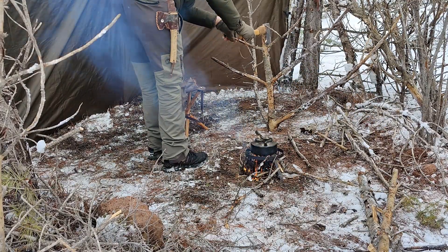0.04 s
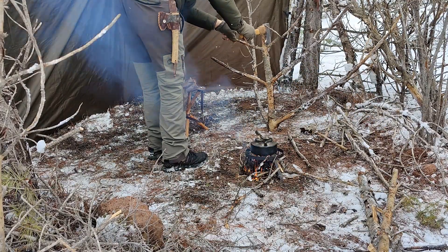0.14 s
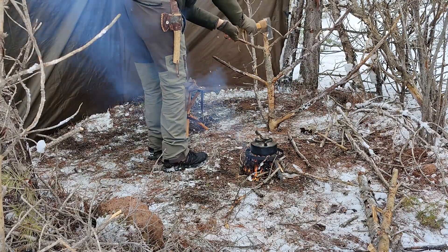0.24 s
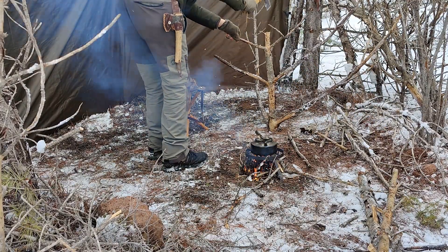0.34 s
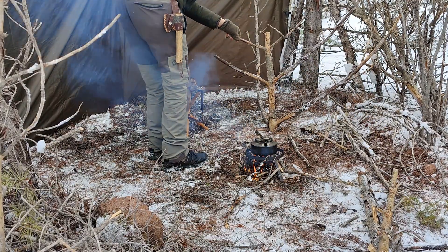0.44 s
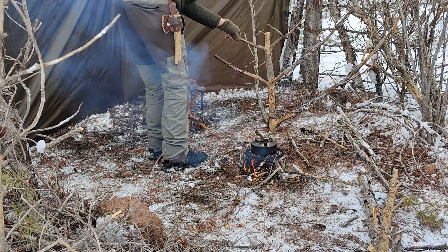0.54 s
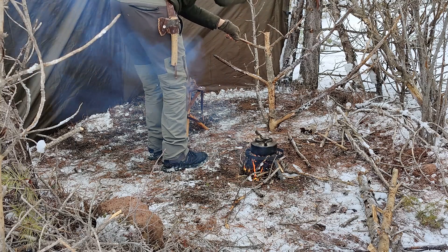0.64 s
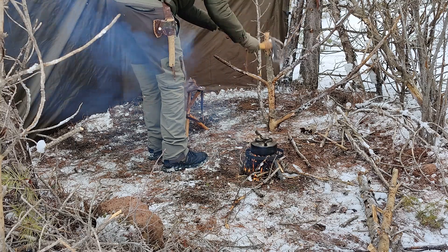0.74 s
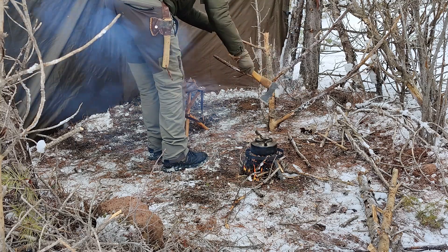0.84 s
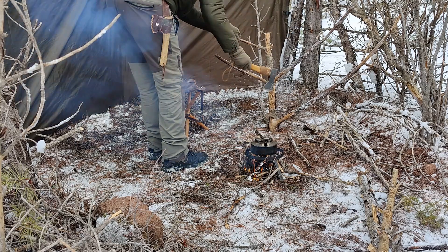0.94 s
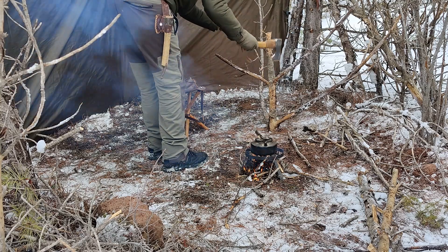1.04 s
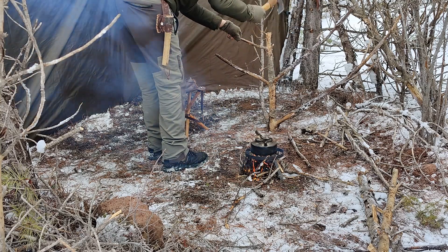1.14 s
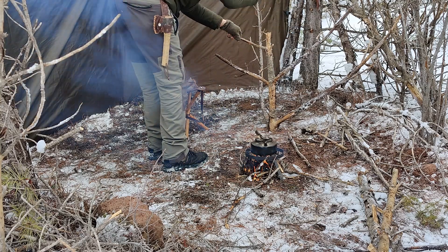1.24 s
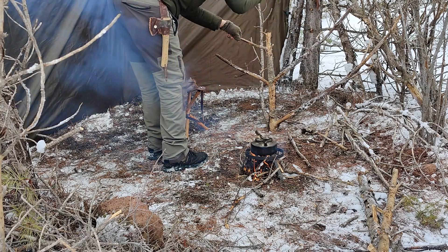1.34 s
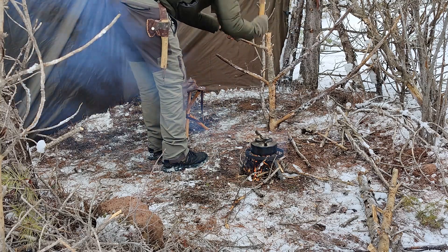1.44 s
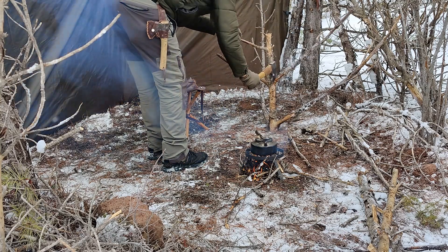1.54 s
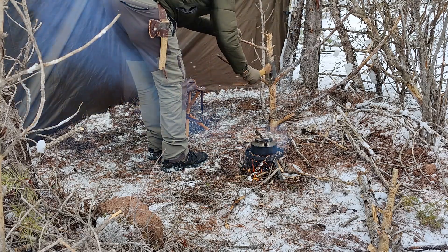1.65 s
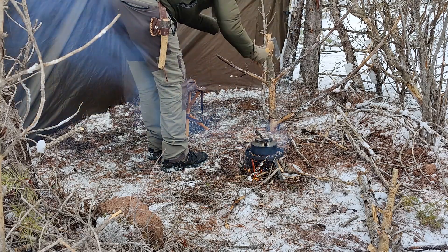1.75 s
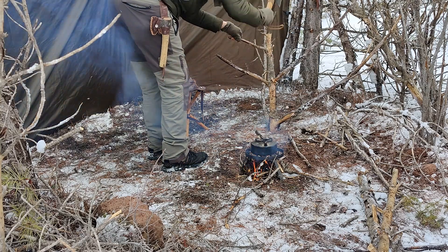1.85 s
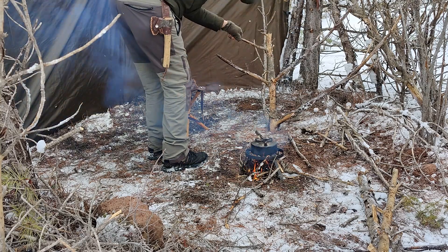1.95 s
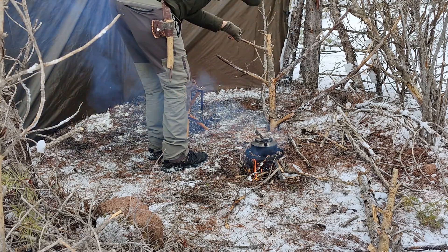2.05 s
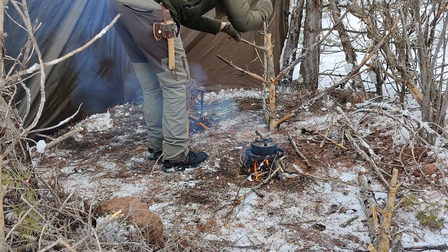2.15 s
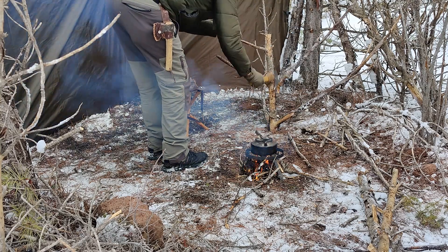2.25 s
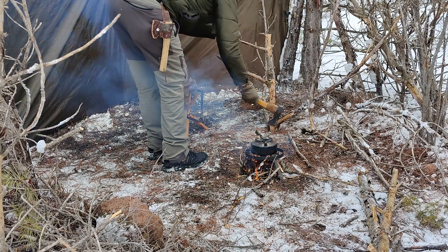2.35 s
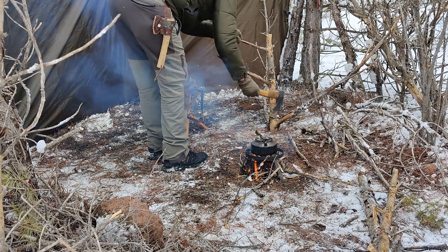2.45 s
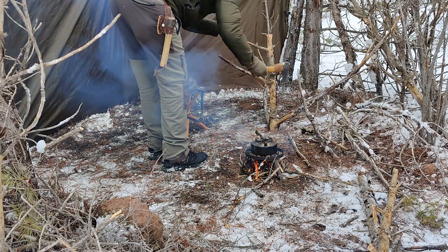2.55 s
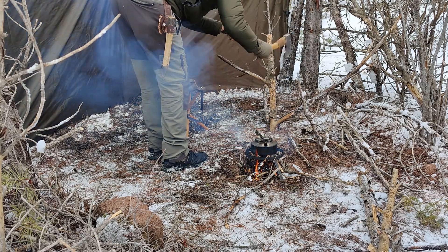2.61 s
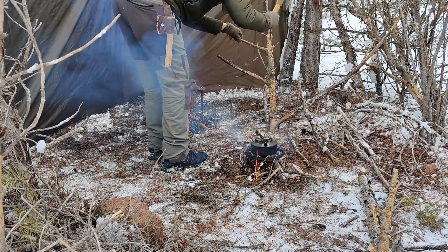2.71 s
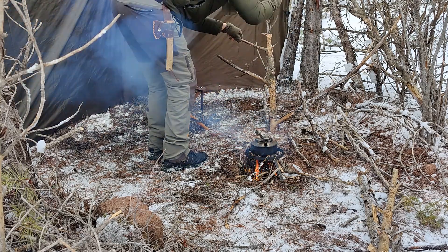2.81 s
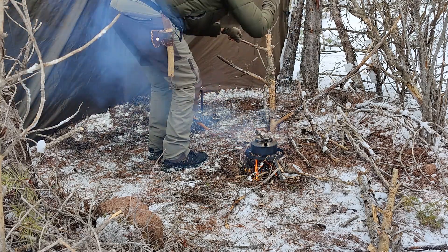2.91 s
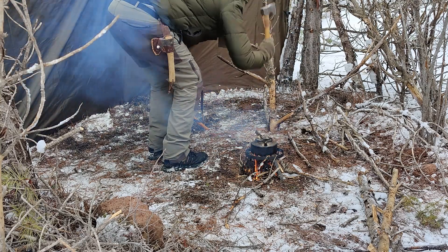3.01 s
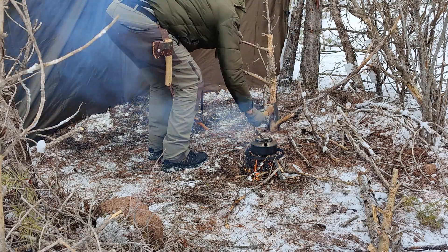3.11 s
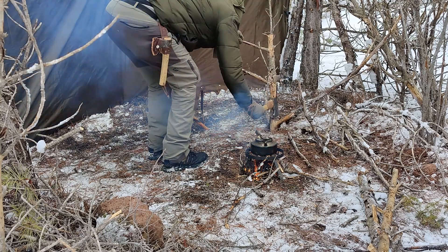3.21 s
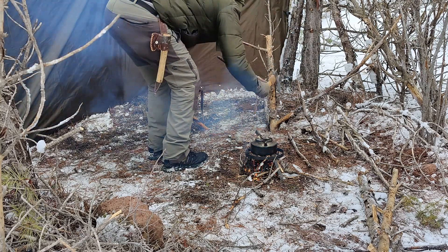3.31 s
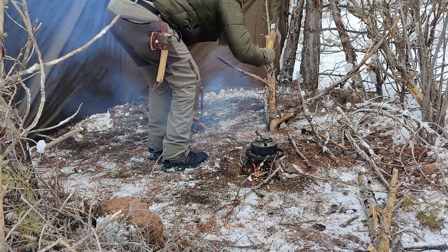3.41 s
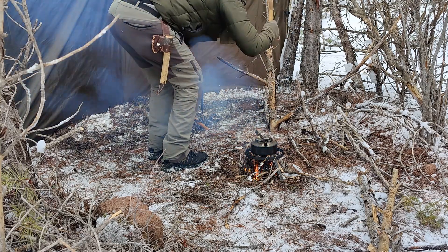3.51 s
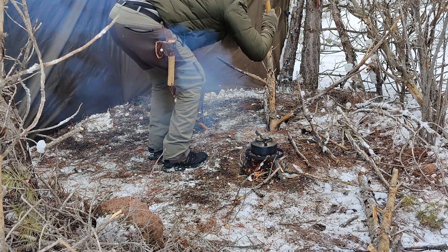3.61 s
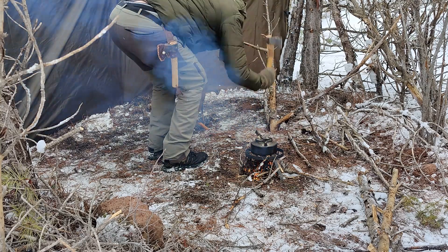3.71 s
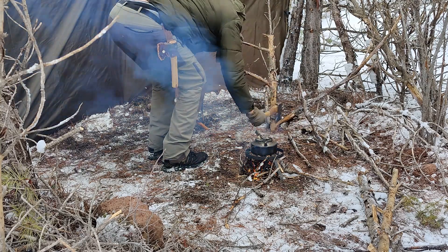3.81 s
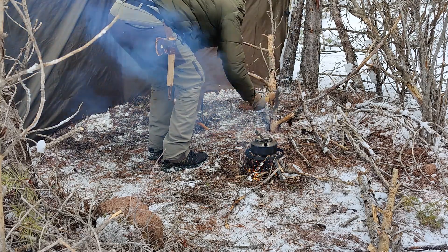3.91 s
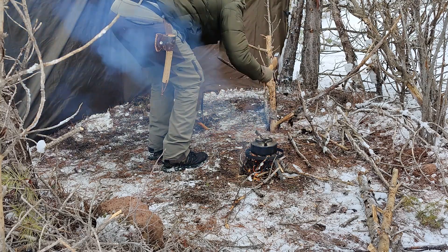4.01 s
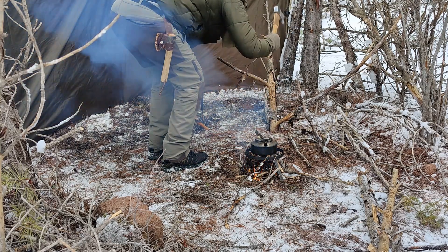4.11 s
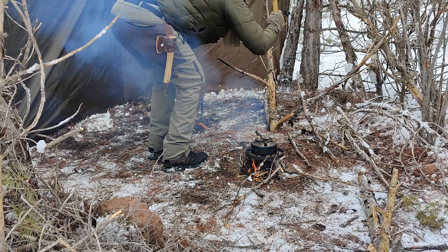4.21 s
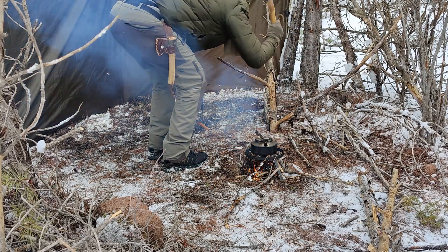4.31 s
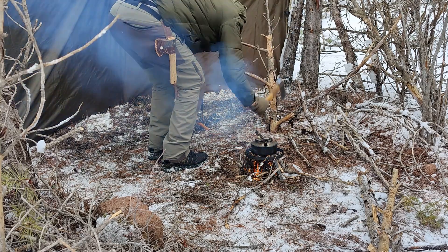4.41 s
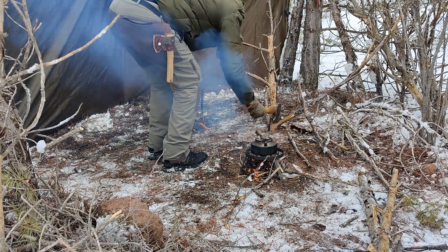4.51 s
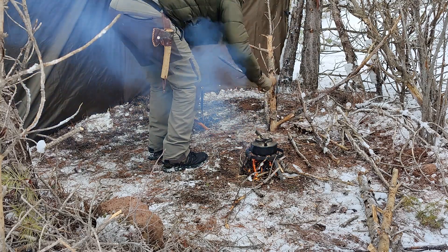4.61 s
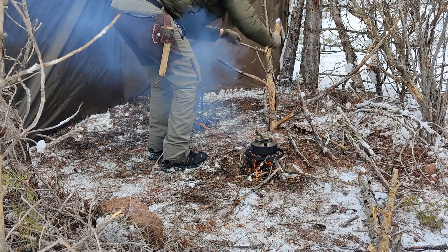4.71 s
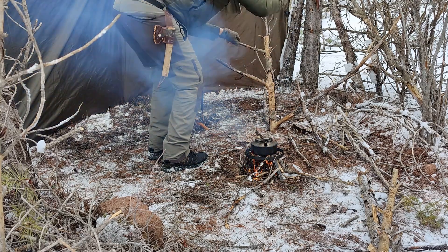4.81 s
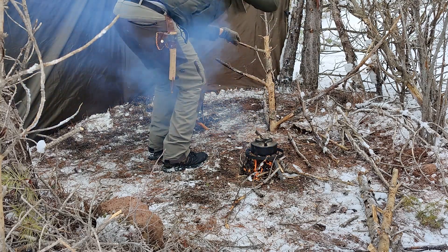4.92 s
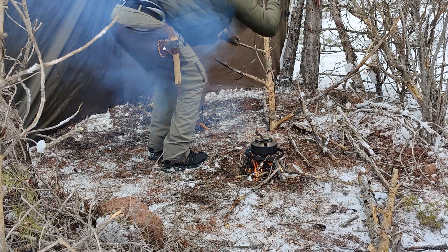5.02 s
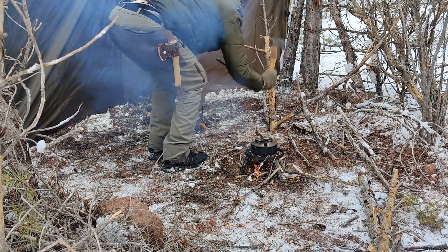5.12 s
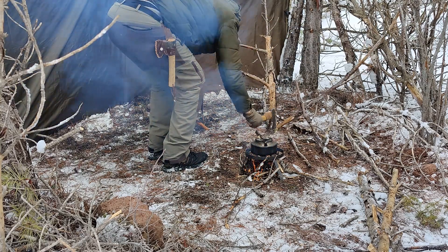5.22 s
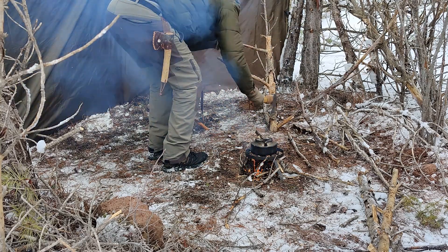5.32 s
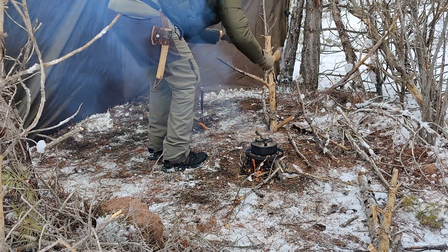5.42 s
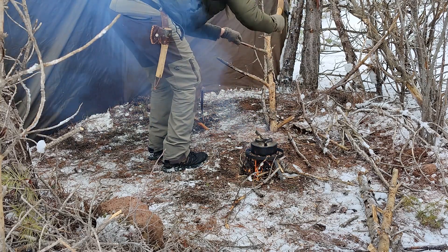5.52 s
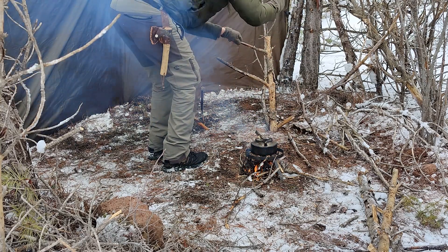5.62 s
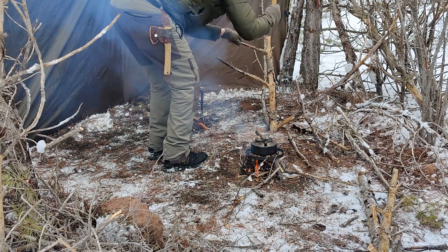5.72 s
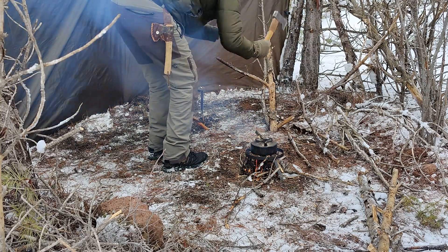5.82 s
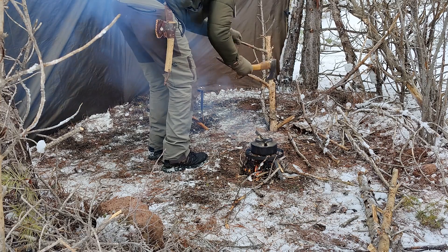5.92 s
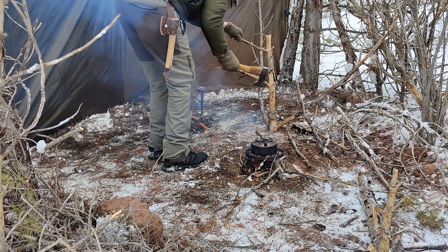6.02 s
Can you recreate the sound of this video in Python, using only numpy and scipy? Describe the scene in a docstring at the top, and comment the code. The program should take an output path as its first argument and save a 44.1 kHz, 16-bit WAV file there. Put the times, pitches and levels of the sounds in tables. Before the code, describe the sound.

Quiet low wind throbs under a very faint air hiss; soft cloth or boot scuffs and a small patter come at 0.1-0.4 s. At 0.87 s a hatchet hits a thin standing sapling: a bright, splintery crack with little thump, then a dense flurry of snapping twigs and falling bark until 1.2 s. The second blow at 1.65 s adds a low soil thud and high ticking chips around 2 s. The third, 2.38 s, is duller and lower, with rustling sleeves after it. The fourth, 3.24 s, has a hard double crack and strong thump. Blows at 3.91, 4.57 and 5.29 s are the loudest knocks, short, hollow and woody around 1.8 kHz, with fewer crumbs between. Wind drops away after 4 s. Light rubbing and sparse ticks finish to 6 s. Dry outdoor space, stereo microphone a few metres off, slight scatter from trunks.

```python
"""First a low wind rumble over faint air hiss, with a soft scuff of cloth or boots and a little patter.
Then a hatchet chops a thin standing sapling, a few metres from two microphone ports, on frozen forest ground.
Each blow rings damped stem modes, cracks in noise bands and sends a late low wave packet through the soil.
Twigs, chips and second cracks just after some blows are clicks with a crackle and one ringing mode; bark and
needles patter as grainy noise; sleeves and boots rub as dull noise."""
import sys
import numpy as np
from scipy import signal
from scipy.fft import rfft, irfft, next_fast_len
from scipy.io import wavfile
from scipy.ndimage import uniform_filter1d

SR = 44100
rng = np.random.default_rng(int(sys.argv[2]) if len(sys.argv) > 2 else 0)


def wav_out(sig):
    """Save sig, one row per channel (or a flat mono array), as 16-bit PCM at SR to the path in sys.argv[1]."""
    wavfile.write(sys.argv[1], SR, np.round(np.clip(np.atleast_2d(sig).T, -1, 1) * 32767).astype(np.int16))


N = 266893  # length in samples


def undb(db):
    """Turn dB into amplitude gain."""
    return 10 ** (np.asarray(db) / 20)


def on_log(points, hz):
    """Read (frequency [Hz], value) points on a log-frequency axis."""
    point_hz, values = np.transpose(points)
    return np.interp(np.log(np.maximum(hz, 1)), np.log(point_hz), values)


def unit(x):
    """Scale to rms 1."""
    return x / np.sqrt(np.mean(x ** 2))


def band(x, lo_hz, hi_hz):
    """Causal band-pass, so nothing sounds ahead of its cause."""
    return signal.sosfilt(signal.butter(2, [lo_hz, hi_hz], "band", fs=SR, output="sos"), x)


def coloured(x, points):
    """Shape the spectrum by (frequency [Hz], level [dB]) points; rms 1."""
    size = next_fast_len(N)
    hz = np.arange(size // 2 + 1) * SR / size
    shaped = irfft(rfft(x, size) * undb(on_log(points, hz)), size)[:, :N]
    return unit(shaped)


def grains(n, grit_db, hold):
    """Three noises sharing grains of hold samples with scattered sizes; rms near 1."""
    grain_db = grit_db * np.minimum(rng.exponential(1, n // hold + 1), 3.5)
    sizes = undb(grain_db).repeat(hold)[:n]
    return rng.standard_normal((3, n)) * sizes / np.sqrt(np.mean(sizes ** 2))


def walk(rate):
    """Random levels, rate new ones a second, joined by straight slopes; spread a little under 1."""
    k = int(SR / rate)
    return uniform_filter1d(np.repeat(rng.standard_normal(N // k + 1), k), k)[:N]


def fade(t, t60, rise):
    """Fast rise, then decay by 60 dB in t60."""
    return (1 - np.exp(-t / rise)) * undb(-60 * t / t60)


def add(out, s, sound):
    """Mix a sound in at time s."""
    i = int(s * SR)
    out[:, i:i + sound.shape[1]] += sound[:, :N - i]


PORT_LAG_S = 3 / 44100  # the left port hears a source this much later
# how alike the two ports hear one source: (frequency [Hz], power share common to both, before scaling [1])
LIKENESS = [(100, 1), (600, 0.92), (2000, 0.097), (5000, 0.21), (12000, 0.11)]


def ports(excite, alike=0.96):
    """Two ports hear one source: the bass alike, the left a little late, the treble mostly unrelated."""
    size = next_fast_len(excite.shape[1])
    hz = np.arange(size // 2 + 1) * SR / size
    common = np.clip(alike * on_log(LIKENESS, hz), 0, 1)
    both, left, right = rfft(excite, size)
    late = np.exp(-2j * np.pi * hz * PORT_LAG_S)
    shared = np.sqrt(common) * both * np.array([late, late ** 0])
    own = np.sqrt(1 - common) * np.array([left, right])
    return irfft(shared + own, size)[:, :excite.shape[1]]


def patchy(x, lo_hz, count, patchy_db, rate):
    """Third-octave bands that each flare and sink on their own, as in folds of cloth; rms 1."""
    edges = lo_hz * 2 ** (np.arange(count + 1) / 3)
    total = 0
    for k in range(count):
        flare = undb(patchy_db * walk(rate))
        # alternate signs keep neighbouring bands from cancelling where they meet
        total = total + (-1) ** k * flare * band(x, edges[k], edges[k + 1])
    return unit(total)


def ring(hz, db, t60):
    """One damped mode, a decaying sine alike at both ports, cut off after t60."""
    t = np.arange(int(t60 * SR)) / SR
    return np.tile(undb(db) * fade(t, t60, .0002) * np.sin(2 * np.pi * hz * t), (2, 1))


# slow course of the wind rumble, before its throb: (time [s], level [dB])
WIND = [(0, -62), (.1, -53), (.5, -58.5), (.85, -56), (.98, -58), (1.2, -55.5), (1.5, -54.5), (1.85, -58),
        (2.2, -53), (2.55, -54), (2.8, -55.5), (3.2, -55), (3.5, -51.5), (3.66, -57), (3.85, -55.5),
        (4.1, -63.5), (5, -66.5), (6.05, -67)]


def wind_db():
    """Level of the wind rumble, sample by sample, in straight slopes."""
    return np.interp(np.arange(N) / SR, *np.transpose(WIND))


AIR_DB, HISS_SHARE = -67, .15  # hiss level at the strongest wind, dB; dB it sinks per dB of rumble
# colour of the wind rumble: (frequency [Hz], relative level [dB per Hz])
GUST = [(12, -38.5), (20, -13.5), (48, -2), (70, 1), (87, -4.5), (145, -16), (193, -23.5), (231, -30.5),
        (300, -30), (390, -53), (660, -120)]
# colour of the air hiss: (frequency [Hz], relative level [dB per Hz])
AIR = [(88, -26.5), (150, -13), (259, -18.5), (888, -21), (1120, -13.5), (2700, -25.5), (5910, -28.5),
       (7180, -27), (13700, -27.5), (16000, -27.5)]


def air():
    """Wind as low noise that throbs at random, over a faint wide hiss that follows it weakly."""
    wind = wind_db()
    gusts = coloured(ports(rng.standard_normal((3, N))), GUST)
    rumble = undb(wind + 1.6 * walk(4)) * gusts
    hiss = coloured(ports(rng.standard_normal((3, N)), alike=0.085), AIR)
    hiss_db = AIR_DB + HISS_SHARE * (wind - wind.max()) + 1.5 * walk(3)
    return rumble + undb(hiss_db) * hiss


TWIG_SOUGH_DB, SOUGH_SHARE = -68.5, 0.24  # dull sough at the strongest wind, dB; dB it sinks per dB of rumble
# rubs of cloth and boots: (middle time [s], half length to 1/e of the gain [s], level [dB])
SCUFFS = [(.03, .04, -68), (0.16, 0.011, -59), (0.23, 0.022, -65.5), (1.044, 0.021, -55),
          (1.718, 0.057, -60.5), (1.882, 0.035, -61.5), (2.088, 0.014, -55.5), (2.451, 0.074, -53.5),
          (2.594, 0.016, -53.5), (2.674, .03, -56), (2.765, 0.028, -59.5), (2.877, 0.063, -59.5),
          (3.012, 0.065, -63.5), (3.188, 0.078, -65), (3.3, 0.071, -58.5), (3.407, 0.0075, -44.5),
          (3.445, 0.068, -58), (3.568, 0.059, -52.5), (3.79, 0.059, -64), (3.899, 0.021, -54.5),
          (3.978, 0.053, -59), (4.122, 0.015, -51.5), (4.243, 0.054, -57.5), (4.43, 0.011, -63.5),
          (4.533, 0.11, -62), (4.632, 0.035, -54.5), (4.809, 0.021, -57.5), (4.877, 0.052, -63.5),
          (5.125, .04, -60), (5.277, 0.026, -57), (5.362, 0.056, -58.5), (5.537, 0.0099, -71),
          (5.827, 0.013, -62), (5.87, 0.028, -61.5), (5.93, .04, -66), (6.043, 0.047, -57)]


def scuffs():
    """Gain of the dull rub: bell-shaped scuffs over a sough of twigs that follows the wind; powers add."""
    t = np.arange(N) / SR
    wind = wind_db()
    power = undb(TWIG_SOUGH_DB + SOUGH_SHARE * (wind - wind.max())) ** 2
    for s, half, db in SCUFFS:
        power = power + undb(2 * db) * np.exp(-2 * ((t - s) / half) ** 2)
    return np.sqrt(power)


SHOWER_RISE_S = 0.024
# bark and needles, shaken loose by a blow or brushed off:
# (start time [s], t60 [s], patter level [dB], middle level [dB], top minus patter level [dB])
SHOWERS = [(.01, 0.2, -59.5, -62, -10), (.14, .3, -67.5, -61, -8), (.205, 0.22, -49.5, -54.5, -5),
           (.79, .2, -58, -67.5, -6), (.89, 0.45, -44.5, -49, 3.5), (0.95, 0.22, -36, -33.5, 1),
           (1.02, 0.72, -53, -58, 3.5), (1.11, 0.34, -46, -67, -4), (1.185, 0.43, -53.5, -67.5, -1),
           (1.35, 0.27, -70, -66.5, -17), (1.69, 0.47, -55, -51.5, -7), (1.814, 0.24, -45.5, -47, 0.5),
           (1.85, 1.36, -58, -65, 1.5), (2.42, 0.41, -51.5, -47.5, -1.5), (2.525, 0.7, -52.5, -57.5, -0.5),
           (2.585, 0.58, -53, -55.5, 0), (2.7, 0.33, -59, -58, -8), (2.76, 0.15, -76, -66, -7),
           (2.85, 0.56, -74, -71, -9.5), (3.29, 0.45, -54.5, -52.5, -1), (3.388, 0.66, -55, -49, -0.5),
           (3.538, 0.9, -59.5, -62, -5), (3.96, 1.09, -53.5, -54, 1.5), (4.06, 0.43, -70.5, -50.5, 5),
           (4.22, 0.23, -67, -52.5, -1.5), (4.41, .6, -72.5, -77, 5), (4.48, 1.8, -71.5, -60, 3),
           (4.619, 0.66, -55.5, -52, -4), (4.69, 1.33, -67, -64.5, -7.5), (4.86, 0.26, -58.5, -60.5, -6.5),
           (5.079, 0.46, -77.5, -66, 0), (5.2, 1.5, -68, -64, -10), (5.34, 0.63, -54, -59.5, -5.5),
           (5.97, .6, -70, -61.5, -9)]


def showers():
    """Gains of patter, middle rustle and top: each shower swells at once and thins out; powers add."""
    power = np.zeros((3, N))
    for s, t60, patter_db, middle_db, top_db in SHOWERS:
        shape = fade(np.arange(int(t60 * SR)) / SR, t60, SHOWER_RISE_S)
        gains = undb([[patter_db], [middle_db], [patter_db + top_db]])
        add(power, s, (gains * shape) ** 2)
    return np.sqrt(power)


CRUMBS_PER_S, CRUMB_CYCLES = 170, 8  # crumbs per second; cycles for a tick to die by 60 dB
CRUMB_DB, CRUMB_SCATTER_DB = 6, 3.5  # least level over the shower, dB; mean random extra, about, dB
CRUMB_LO_HZ, CRUMB_HI_HZ = 1400, 13000


def crumbs(patter, middle):
    """Single crumbs of bark tick out of the showers, each a tiny ring with its own pitch, size and side."""
    out = np.zeros((2, N))
    for when, pitch, size, side in rng.random((int(CRUMBS_PER_S * N / SR), 4)):
        hz = CRUMB_LO_HZ * (CRUMB_HI_HZ / CRUMB_LO_HZ) ** pitch
        gain = middle if hz < BANDS[2][0] else patter
        shower = gain[int(when * N)]
        db = CRUMB_DB - CRUMB_SCATTER_DB * np.log(max(size, .03))
        sides = undb([[8 * (side - .5)], [8 * (.5 - side)]])
        add(out, when * N / SR, shower * ring(hz, db, CRUMB_CYCLES / hz) * sides)
    return out


UPPER_DB = 2  # upper octave of the middle rustle, against the mean of middle and patter
# colour of the dull rub: (frequency [Hz], relative level [dB per Hz])
SCUFF = [(120, -30.5), (200, -1), (270, -4.5), (561, 0.5), (916, -6), (1400, -6.5), (1850, -22.5),
         (2000, -11.5), (2600, -56), (4400, -120)]


def rustle():
    """Dense grains of falling bark and needles, and the duller rub of cloth and boots, in flaring bands."""
    patter, middle, top = showers()
    fine = ports(grains(N, 3, hold=60), alike=.7) * undb(2.2 * walk(60))
    bright = patchy(fine, BANDS[2][0], count=2, patchy_db=2.5, rate=30)
    high = patchy(fine, BANDS[3][0], count=3, patchy_db=2.5, rate=30)
    mid = patchy(fine, 1400, count=3, patchy_db=3, rate=25)
    upper = patchy(fine, 2800, count=3, patchy_db=3, rate=25)
    rub = coloured(ports(rng.standard_normal((3, N)), alike=0.7), SCUFF)
    rub = patchy(rub, 200, count=10, patchy_db=3, rate=25)
    upper_gain = undb(UPPER_DB) * np.sqrt(middle * patter)
    # signs are chosen so that bands meeting at an edge do not cancel
    falling = middle * mid - upper_gain * upper - patter * bright - top * high
    return falling + scuffs() * rub + crumbs(patter, middle)


# crackle bands, in order dull, middle, bright, top: (low edge [Hz], high edge [Hz])
BANDS = [(400, 2500), (2500, 5200), (6000, 9000), (9000, 17000)]


def burst(dbs, t60s, pan_db, grit_db, length, rise, tick=0.):
    """Crackle in each band, dying at its own pace; the body around the ports shades low bands less."""
    t = np.arange(int(length * SR)) / SR
    noise = grains(len(t), grit_db, hold=24)
    noise[:, int(rise * SR)] += tick  # the break itself is one sharp click
    noise = ports(noise)
    side = np.array([[pan_db], [-pan_db]]) / 2
    total = 0
    for k, (db, t60, (lo, hi)) in enumerate(zip(dbs, t60s, BANDS)):
        gain = undb(db + side * min(lo / BANDS[2][0], 1))
        gain = gain * np.sqrt(SR / 2 / (hi - lo))  # make up for the noise power outside the band
        # alternate signs keep neighbouring bands from cancelling where they meet
        total = total + (-1) ** k * gain * band(noise * fade(t, t60, rise), lo, hi)
    return total


SNAP_TOP_DB, SNAP_MIDDLE_DB = -9, -4  # top against bright; middle against the mean of dull and bright
RING_CYCLES = 20  # cycles for the ring to die by 60 dB
# snapping twigs, falling chips and second cracks just after some blows:
# (time [s], bright level [dB], dull level [dB], ring level [dB],
# ring frequency [Hz], base t60 of the crackle, scaled per band [s], left minus right in the bright and top [dB])
SNAPS = [(0.337, -56.5, -73, -64, 7050, 0.096, 4), (.801, -56.5, -61, -73, 1100, 0.037, 0),
         (.8976, -42, -60, -48, 7200, .02, 4), (.9217, -34, -54, -48, 7200, 0.038, 2),
         (0.9497, -54, -37, -36.5, 686, 0.029, 0), (0.958, -29, -41, -20.5, 3230, 0.08, 2),
         (0.973, -37, -47.5, -26, 3730, 0.11, 0), (.9905, -34.5, -51, -31, 3560, 0.085, 0),
         (1.042, -51, -54, -40.5, 1000, 0.042, 0), (1.0804, -47, -64, -50, 11000, 0.031, -2),
         (1.1194, -53, -58, -32, 4460, 0.037, -6), (1.1722, -42, -64, -60, 7200, .012, 5),
         (1.2258, -49, -70, -48, 3430, 0.034, 2), (1.4886, -62.5, -68, -53, 11000, 0.068, -1),
         (1.5494, -73, -90, -45.5, 3400, .02, -5), (1.8201, -35, -44.5, -31, 4980, 0.042, -1),
         (1.8785, -53, -52, -42, 665, 0.12, 7), (1.946, -52, -66, -35, 11400, .05, -2),
         (1.9643, -49.5, -59, -23.5, 10000, 0.042, 2), (1.9904, -54, -77, -31, 9500, .025, 3.5),
         (2.0236, -54, -79, -35, 10000, 0.033, -5), (2.0474, -54, -76, -29, 10000, .02, 0),
         (2.085, -49, -55.5, -48, 1110, 0.051, 3), (2.1294, -63, -64, -53, 5370, .023, 11),
         (2.434, -58, -44.5, -30, 1025, 0.074, -3), (2.4632, -61, -43, -39, 1376, 0.067, -3),
         (2.535, -50, -54, -38, 5330, 0.067, -2), (2.5702, -42, -54, -35, 5030, 0.029, 2),
         (2.591, -44.5, -51, -30.5, 4870, 0.19, 0), (2.6277, -43.5, -58, -43, 2040, 0.15, -2),
         (3.195, -66, -54, -51, 640, 0.051, 8), (3.254, -18.5, -27.5, -19.5, 662, 0.057, 3),
         (3.2827, -32, -46, -44, 4370, 0.072, 1), (3.3749, -41.5, -38, -25.5, 2140, 0.049, -2),
         (3.4032, -42.5, -41, -23, 4230, 0.026, 4), (3.5151, -46, -60, -52, 660, 0.059, 2),
         (3.5504, -40, -41, -37, 5500, .017, -3), (3.9224, -29, -36.5, -22.5, 675, 0.15, -1),
         (4.078, -41, -58.5, -58, 5300, 0.056, 3), (4.1207, -51, -38, -31, 3500, 0.022, -3),
         (4.2465, -59, -46, -38, 2940, 0.0083, 4), (4.2864, -74, -57.5, -47, 1420, .04, -4),
         (4.3075, -75, -58, -51, 2880, .012, 1), (4.3724, -66.5, -78, -41, 11000, 0.068, -2.5),
         (4.418, -71.5, -67, -54, 2980, .04, -.5), (4.491, -55, -52, -42, 2970, 0.013, 3),
         (4.5067, -65, -51, -47, 663, 0.013, -5), (4.515, -76, -55, -49, 1354, .03, -2),
         (4.5865, -32, -43.5, -33, 900, .012, -4), (4.889, -65, -57.5, -60.5, 600, .03, -1),
         (4.9766, -59.5, -80, -71, 4440, 0.014, -11), (5.2072, -62, -85, -53, 3450, 0.02, 0),
         (5.3014, -21, -36.5, -31.5, 1700, 0.0049, -10), (5.324, -40.5, -44, -33.5, 1300, .015, 1.5),
         (5.461, -48, -61, -53, 4640, .015, -12), (5.8174, -70.5, -68.5, -45, 530, 0.028, -1.5),
         (5.86, -71.5, -65.5, -50, 579, .015, -1)]


def snaps():
    """Each twig, chip or second crack is a click and a short crackle of its own colour, and one brief mode."""
    out = np.zeros((2, N))
    for s, bright_db, dull_db, ring_db, hz, t60, pan_db in SNAPS:
        middle_db = (dull_db + bright_db) / 2 + SNAP_MIDDLE_DB
        dbs = [dull_db, middle_db, bright_db, bright_db + SNAP_TOP_DB]
        t60s = t60 * np.array([0.82, 0.37, 0.62, .9])
        add(out, s, burst(dbs, t60s, pan_db, 1.5, .12, .0002, tick=4.))
        add(out, s, ring(hz, ring_db, RING_CYCLES / hz))
    return out


SOIL_HZ, SOIL_GLIDE = 76, 4  # Hz at the packet's centre; factor of the pitch fall, 1/s
SOIL_RISE_S, SOIL_FALL_S = .010, .019  # swell and fade of the packet, to 1/e
ROOT_HZ, ROOT_DB, ROOT_T60_S = 172.4, -3.5, 0.028  # level is relative to the packet, before the root's swell


def thump(db, delay):
    """A slow wave packet through the soil, quick swings first; the root plate rings briefly above it."""
    t = np.arange(int(.15 * SR)) / SR - delay
    swell = np.exp(-(t / np.where(t < 0, SOIL_RISE_S, SOIL_FALL_S)) ** 2)
    packet = swell * np.sin(2 * np.pi * SOIL_HZ * t * (1 - SOIL_GLIDE * t))
    since = np.maximum(t + .009, 0)  # the root starts 9 ms ahead of the packet's centre
    root_swell = undb(ROOT_DB) * since / 0.0025 * undb(-60 * since / ROOT_T60_S)
    root = root_swell * np.cos(2 * np.pi * ROOT_HZ * (since - .0017))
    return undb(db) * np.tile(np.sqrt(2) * (packet + root), (2, 1))


BITE_S, BITE_SPREAD_S = 0.002208, 0.0021  # time until the blade stops; spread of its push
GRIP_HZ, REACH_DB = 200, -8.5  # width added by the buried blade; dB per squared octave from the centre
# modes of the stem: (frequency [Hz], width without the blade's grip [Hz], relative level [dB])
STEM = [(620, 50, -1), (820, 60, -8), (1091, 94, -2.5), (1354, 250, -0.5), (1480, 420, -6.5),
        (1833, 130, 0.5), (2350, 43, -11.5), (3210, 220, -21.5), (4160, 55, -12), (4530, 73, -4)]


def stem(knock_db, centre_hz):
    """The blade bites and stops after two milliseconds; the blow's centre pitch decides which modes ring."""
    t = np.arange(int(.12 * SR)) / SR - BITE_S
    modes = 0
    for hz, width, db in STEM:
        reach_db = REACH_DB * np.log2(hz / centre_hz) ** 2
        decay = np.exp(-np.pi * (width + GRIP_HZ) * np.maximum(t, 0))
        phase = 1.3 * rng.standard_normal()
        modes = modes + undb(db + reach_db) * decay * np.cos(2 * np.pi * hz * t + phase)
    knock = modes * np.exp(-(np.minimum(t, 0) / BITE_SPREAD_S) ** 2)
    knock = knock * undb(knock_db) / np.sqrt(np.max(knock ** 2) / 2)  # level as of a sine with this peak
    left = .9 * np.roll(knock, int(round(PORT_LAG_S * SR)))
    return np.array([left, knock])


# scatter off the trunks, in the order of BANDS: (level against the crack [dB], t60 [s])
WOODS = [(-18, 0.15), (-13.5, 0.15), (-12.5, 0.15), (-12, 0.17)]
# blows: (start time [s], knock level [dB], crack level [dB], splinter level [dB], sizzle level [dB],
# thump level [dB], splinter left minus right [dB], knock centre [Hz], base t60 of the crack, scaled per band [s],
# woody body level [dB], delay of the thump's centre [s]); body, crack, splinter, sizzle fill BANDS in order
CHOPS = [(0.873, -16.5, -20, -18.5, -23, -43, 9.5, 2490, 0.031, -22, 0.019),
         (1.653, -19, -18.5, -18, -20, -19, -2.5, 1580, 0.03, -19.5, 0.017),
         (2.377, -17.5, -14.5, -22, -17.5, -25.5, -1.5, 690, 0.036, -25, 0.016),
         (3.237, -15.5, -15, -16.5, -22, -14, 0.5, 1030, 0.023, -17.5, 0.017),
         (3.906, -10, -20, -26, -20.5, -14.5, -8.5, 1734, 0.021, -13, .0162),
         (4.57, -10, -19, -26.5, -22, -17, 4, 1820, 0.03, -15.5, 0.018),
         (5.293, -9.5, -17, -21, -25, -13.5, -2.5, 1760, 0.043, -17, 0.016)]


def chops():
    """Each blow is a stem knock, a crack of fibres, its scatter off the trunks around and a thump in the soil."""
    out = np.zeros((2, N))
    woods_db, woods_t60 = np.transpose(WOODS)
    for s, knock_db, *fibres_db, thump_db, pan_db, centre_hz, t60, body_db, delay in CHOPS:
        dbs = np.array([body_db, *fibres_db])
        t60s = t60 * np.array([1.74, 0.82, 1.4, 0.7])
        add(out, s, stem(knock_db, centre_hz))
        add(out, s, burst(dbs, t60s, pan_db, 0.5, 0.17, 0.0014))
        add(out, s + 0.003, burst(dbs + woods_db, woods_t60, 0, 1.5, 0.43, 0.001))
        add(out, s, thump(thump_db, delay))
    return out


def scene():
    """Wind and hiss, rustle, snaps and the hatchet, summed at the two ports."""
    return air() + rustle() + snaps() + chops()


TOP_HZ = 16800  # upper limit of the recorder
# treble resonances of the microphone ports: (frequency [Hz], level [dB])
PORT = [(5000, 1.5), (6300, 4.5), (6900, 5.5), (7300, 9.5), (7800, -1.5), (8600, -4), (12800, 2.5),
        (14000, 8), (14900, 4.5), (15600, 6), (16000, -33.5)]


def record(dry):
    """The microphone ports resonate in the treble; the recorder cuts the top."""
    hz = np.linspace(0, SR / 2, 257)
    # the minimum-phase step halves the dB, so they go in doubled
    taps = signal.minimum_phase(signal.firwin2(1023, hz, undb(2 * on_log(PORT, hz)), fs=SR))
    resonant = signal.lfilter(taps, 1, dry)
    return signal.sosfilt(signal.ellip(8, .2, 70, TOP_HZ, fs=SR, output="sos"), resonant)


dry = scene()
out = record(dry)
wav_out(out)
```